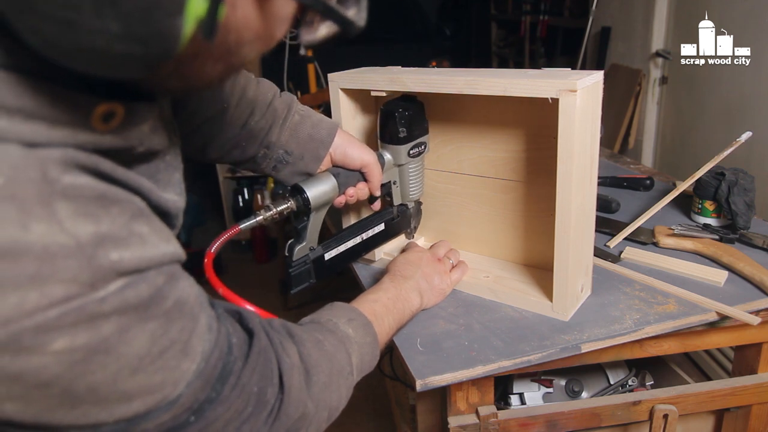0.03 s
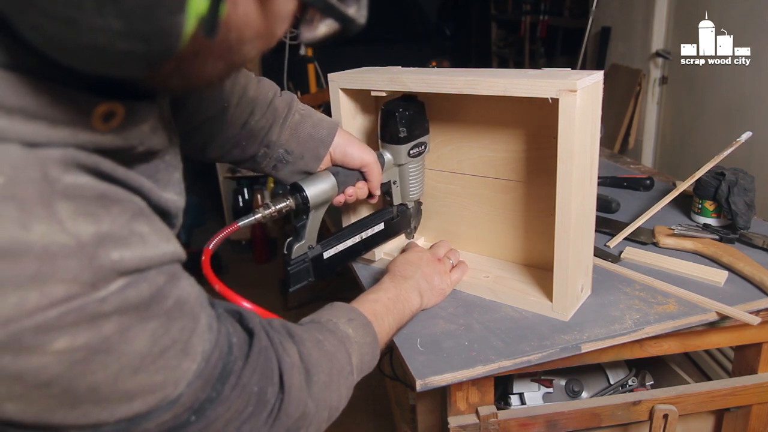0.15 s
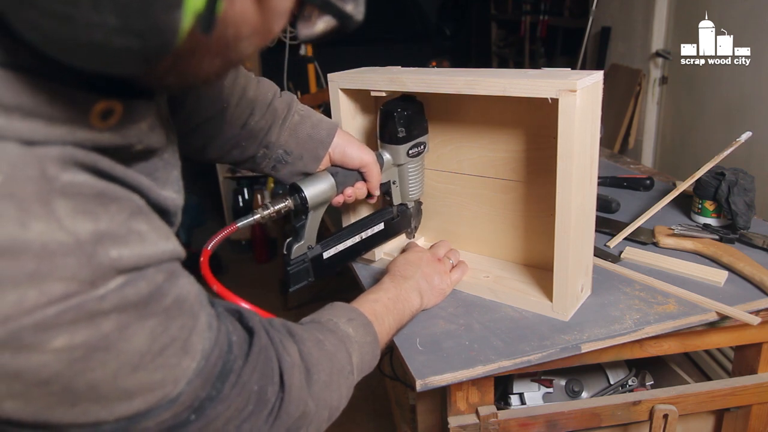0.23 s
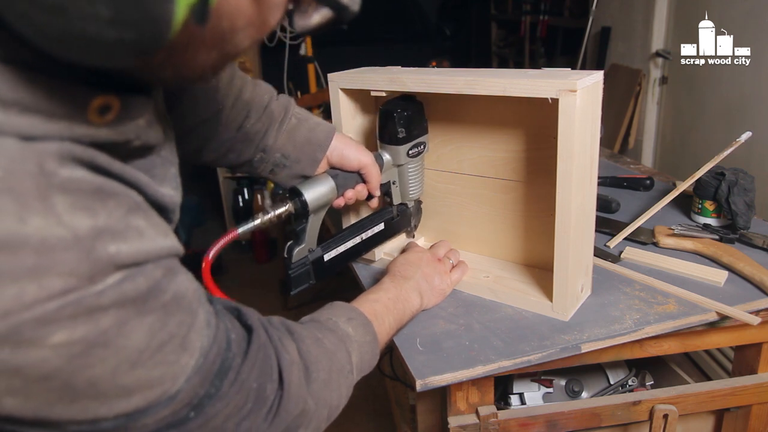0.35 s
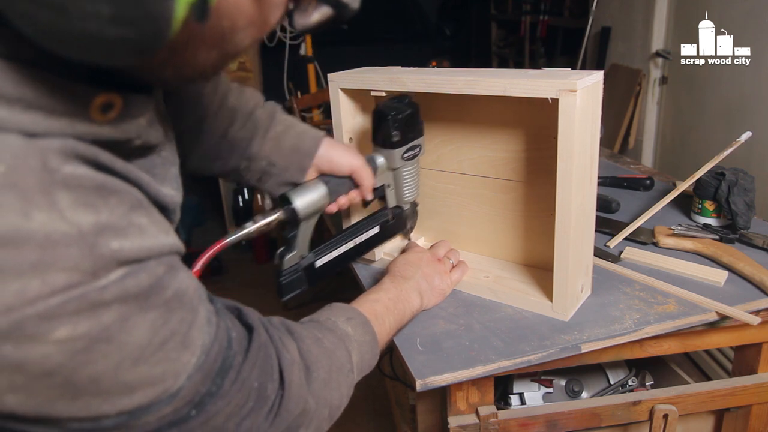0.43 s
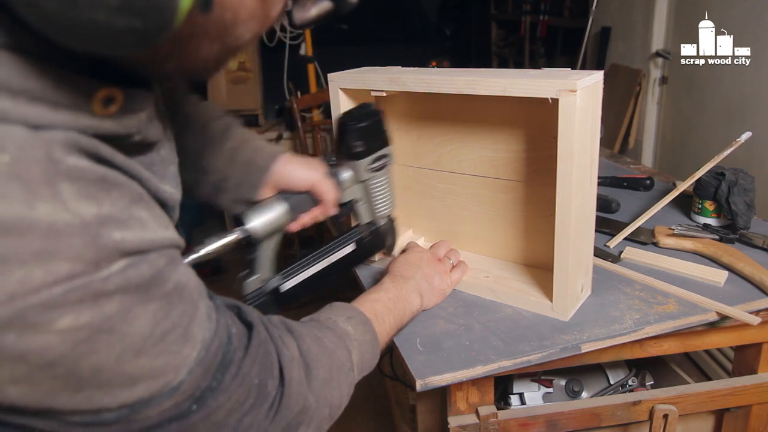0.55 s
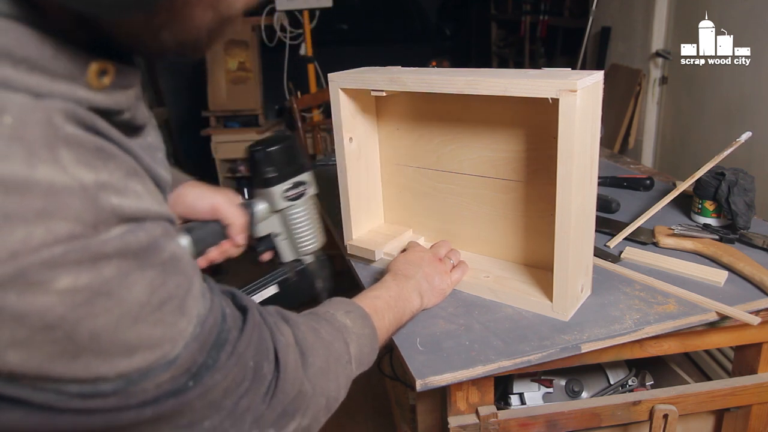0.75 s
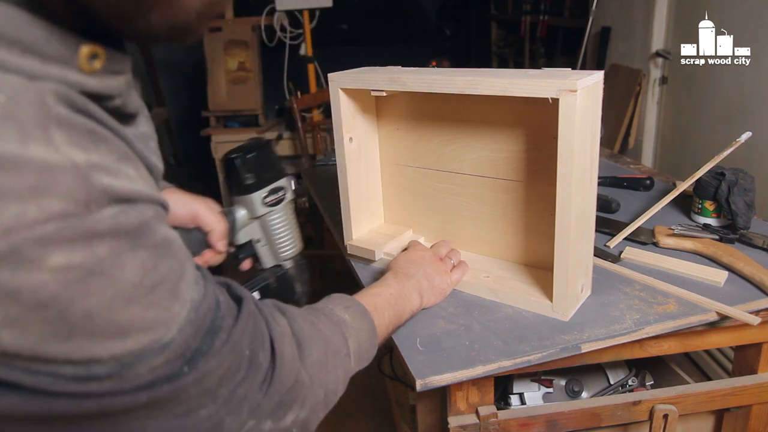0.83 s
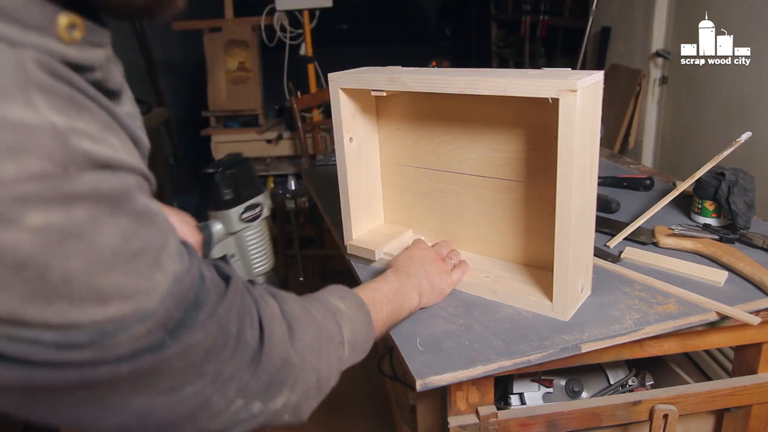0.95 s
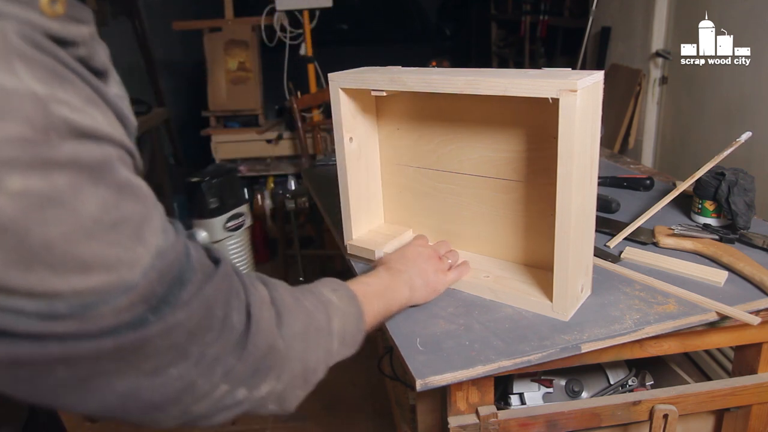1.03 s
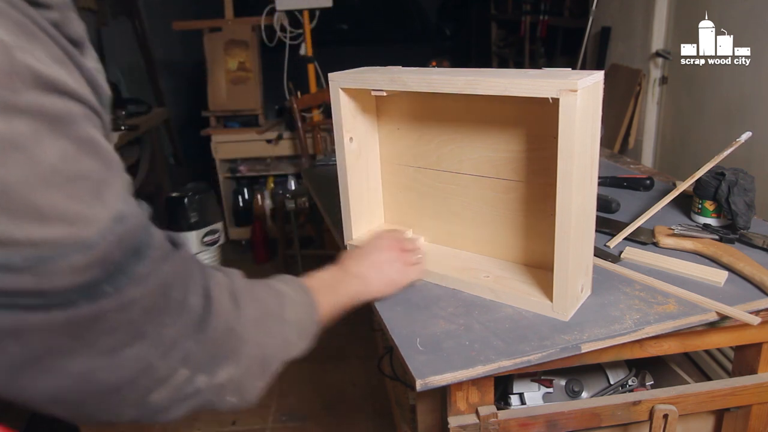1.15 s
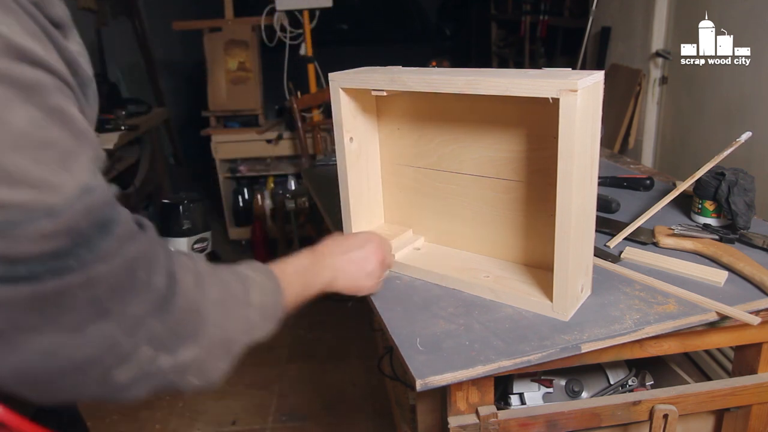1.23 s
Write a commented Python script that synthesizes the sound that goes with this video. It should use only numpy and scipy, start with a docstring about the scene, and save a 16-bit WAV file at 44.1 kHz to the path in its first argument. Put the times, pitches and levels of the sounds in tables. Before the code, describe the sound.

A pneumatic nail gun fires once into a wooden box, a brief air hiss snapping into a loud bang. A trigger click, light tool clacks and a faint wooden slide and knock follow, heard close up in a workshop.

```python
"""A workshop, close up: a pneumatic nailer drives one nail into a wooden box.
Air hisses into the cylinder, the piston slams, and box and room ring; the trigger pings back and the
gun clacks as it lifts. A hand then slides and knocks a wooden block.
The shot overloads a limiter, whose gain dips and creeps back."""
import sys
import numpy as np
from scipy import signal
from scipy.fft import rfft, irfft
from scipy.io import wavfile
from scipy.ndimage import uniform_filter1d

SR = 44100
rng = np.random.default_rng(int(sys.argv[2]) if len(sys.argv) > 2 else 0)


def to_wav(sig):
    """Store sig (one row per channel, or 1-D mono) as 16-bit WAV at the path in sys.argv[1].

    Samples outside -1..1 are clipped; the rate is SR.
    """
    pcm = np.clip(np.atleast_2d(sig), -1, 1) * 32767
    pcm = np.round(pcm).astype(np.int16)
    wavfile.write(sys.argv[1], SR, pcm.T)  # frames by channels


N = 57330

# Levels are relative; a colour is a spectrum shape, per Hz.
# room tone (f/Hz, level/dB)
ROOM_TONE_COLOUR = [(20, -9.5), (70, -6), (145, -1), (250, -6), (450, -9.5), (900, -11.5), (2500, -16.5),
                    (6000, -21.5), (9500, -29.5), (12500, -37), (16000, -60.5)]
# near reflections and long tail: colours (f/Hz, level/dB), decays (f/Hz, t60/s)
EARLY_COLOUR = [(40, -24), (100, -6), (300, 0.5), (700, -1.5), (1500, 0), (4000, -2), (9000, 1.5),
                (15000, 0)]
LATE_COLOUR = [(50, 0), (300, 5), (1000, -2), (3000, 0), (7000, 1), (15000, -5.5)]
EARLY_DECAY = [(60, 0.36), (300, 0.41), (1000, 0.094), (4000, 0.23), (9000, 0.16), (15000, 0.03)]
LATE_DECAY = [(60, 3), (300, 0.88), (1000, 1.157), (3000, 1.074), (6000, 0.88), (9000, .7), (15000, 0.35)]
ROOM_TONE_DB, EARLY_DB, LATE_DB = -64.5, -9.5, -20.5

# handling rumble: fader (t/s, level/dB), colour (f/Hz, level/dB)
RUMBLE_FADER = [(0, -61.5), (.06, -70), (0.169, -65.5), (.25, -74), (.42, -70), (.5, -58.5), (.7, -65),
                (.85, -92), (1.1, -81), (1.199, -64.5), (1.3, -71.5)]
RUMBLE_COLOUR = [(20, -16.5), (70, -2.5), (150, -2.5), (250, -6.5), (600, -17.5), (2000, -53),
                 (16000, -78.5)]
# sleeve and block sliding: fader (t/s, level/dB), colour (f/Hz, level/dB)
SLIDE_FADER = [(0, -96), (.17, -79), (.19, -71.5), (0.233, -67), (.3, -73), (.85, -75.5), (.93, -72),
               (1.05, -68.5), (1.1, -59), (1.181, -63), (1.225, -53), (1.261, -58), (1.3, -55)]
SLIDE_COLOUR = [(50, -16), (200, 2.5), (500, 4), (900, 3), (1700, 0), (2600, 1.5), (3800, -4), (6500, -0.5),
                (9500, -4.5), (12000, -19), (16000, -34)]
# the box bumping the bench (t/s, f/Hz, level/dB, t60/s)
BOX_BUMPS = [(.2, 275, -45, 0.071), (0.572, 376, -38.5, 0.11), (0.643, 145.2, -54.5, 0.63),
             (0.701, 69.4, -62, 1)]
# the block's knock (t/s, level/dB, t60/s) and colour (f/Hz, level/dB)
BLOCK_HIT = (1.2424, -42, 0.05)
BLOCK_COLOUR = [(60, -40), (250, -8), (400, 1.5), (560, 6), (750, -2), (1000, -1.5), (1500, -9.5),
                (3000, -13), (8000, -21), (15000, -31)]

# gun clacks (t/s, level/dB, t60/s, low shelf/dB, high shelf/dB) and colour (f/Hz, level/dB)
CLACK_HITS = [(0.6303, -34.5, 0.023, -31, -11), (1.0659, -43, 0.028, 8, 3.5)]
CLACK_COLOUR = [(60, 2), (350, -14.5), (600, -4), (1000, 9.5), (1700, -3), (2400, -0.5), (3500, -1.5),
                (4450, 0.5), (5400, -13), (8000, -9), (15000, -28)]
# the gun's metal ringing at each clack (f/Hz, level/dB, t60/s)
METAL_MODES = [(2330, -3, .06), (2600, -2, .05), (2830, -4, .05), (4400, 2, .06), (4700, -7, .06)]
# the trigger's tick (t/s, level/dB, t60/s) and colour (f/Hz, level/dB)
TRIGGER_HIT = (.4797, -33, 0.032)
TRIGGER_COLOUR = [(200, -37), (4000, -6.5), (6500, -14), (8900, 2.5), (10500, -9), (15000, -22)]
# its spring (f/Hz, level/dB, t60/s)
SPRING_MODES = [(6455, -2, 0.27), (7747, -13, 0.12), (9300, -6.5, 0.12), (12460, -7.5, 0.18)]

# valve hiss (f/Hz, level/dB) and the whistles of the air passages (f/Hz, width/Hz, boost/dB)
AIR_COLOUR = [(40, -33), (170, -19.5), (400, -27.5), (700, -17), (1500, -17), (2200, -11.5), (2700, -3.5),
              (3250, -16.5), (3800, -3), (4900, -13.5), (7000, -4.5), (9200, -4.5), (11000, -10.5),
              (15500, -24.5)]
AIR_WHISTLES = [(2360, 110, -0.5), (2970, 180, 6), (3753, 150, 2.5), (4380, 42, 9.5), (5740, 110, 10),
                (6925, 110, 5), (7670, 60, 0.5), (9000, 75, 5), (8950, 50, 9.5)]
LEAK_S, OPEN_S, SHUT_S, AIR_RISE_S = .2379, .2405, .281, .00067
AIR_DB, LEAK_DB, AIR_SAG_DB_PER_S, AIR_FLUTTER_DB = -18, -13.5, -330, -1
# dull kicks of valve and piston (t/s, level/dB, t60/s) and their colour (f/Hz, level/dB)
KICK_HITS = [(.2382, -36, .055), (.2778, -27, .018)]
KICK_COLOUR = [(30, -14), (100, -6), (190, 3), (280, -3), (400, -16), (900, -19.5), (3000, -47),
               (16000, -83)]
# the piston's slam and rebounds (t/s, level/dB, t60/s) and their colour (f/Hz, level/dB)
PISTON_HITS = [(.2796, 0, 0.033), (.2824, -4, 0.026), (.2862, -6, 0.039)]
PISTON_COLOUR = [(30, -20), (130, -18.5), (330, -14), (540, -1), (660, -5.5), (760, 0), (960, 3.5),
                 (1150, 3), (1450, 0.5), (1900, -7.5), (2550, -1.5), (3300, -9.5), (6000, -15.5),
                 (10000, -17), (16000, -45)]
# the nail head seating (t/s, level/dB, t60/s) and its colour (f/Hz, level/dB)
NAIL_HIT = (.2833, -1.6, 0.031)
NAIL_COLOUR = [(200, -16.5), (1000, -10), (2500, 0.5), (4700, -0.5), (7500, 1), (10000, -4), (14000, -10.5),
               (16000, -23.5)]
# ring of the box and gun body (f/Hz, level/dB, t60/s)
BODY_MODES = [(305, -10, .2), (800, -8, .14), (882, -7, .14), (942, 2, .18), (1150, -5, .16),
              (1440, -4, .09), (1680, -6, .15), (2432, -10, .13), (2670, -6, .12), (3494, -15, .1),
              (3860, -14, .1)]
METAL_DB, SPRING_DB, BODY_DB = -7, -39.5, -18.5

THRESHOLD_DB, ATTACK_S, RELEASE_DB_PER_S = -16, .0058, 35.5
CEILING_DB, HIGH_CUT_HZ = -9.7, 16100
TIME, FREQS = np.arange(N) / SR, np.fft.rfftfreq(N, 1 / SR)


def amp(db):
    """Decibels to gain."""
    return 10 ** (np.asarray(db) / 20)


def unit(x):
    """Scales to rms 1."""
    return x / np.sqrt(np.mean(x ** 2) + 1e-20)


def curve(points, hz=FREQS):
    """Reads a table on a log-frequency axis."""
    f, value = np.transpose(points)
    return np.interp(np.log(hz + 1), np.log(f + 1), value)


def since(s):
    """Time elapsed since s, zero before it."""
    return np.maximum(TIME - s, 0)


def noise(colour_db):
    """Noise of rms 1 in the given colour."""
    return unit(irfft(rfft(rng.standard_normal(N)) * amp(colour_db), N))


def flicker(samples):
    """Smoothed random modulation of rms 1."""
    return unit(uniform_filter1d(rng.standard_normal(N), size=samples))


def minimum_phase(gain):
    """An EQ response with these gains and no pre-ring."""
    cepstrum = irfft(np.log(gain + 1e-9), N)
    cepstrum[1:N // 2] *= 2
    cepstrum[N // 2 + 1:] = 0
    return np.exp(rfft(cepstrum))


def hit(s, db, t60, colour_db, rise_s=.00057):
    """An impact: a fast-dying noise burst stands for a dense cluster of struck modes."""
    envelope = np.minimum(TIME / rise_s, 1) * amp(-60 * TIME / t60)
    spectrum = rfft(rng.standard_normal(N) * envelope)
    ripple = np.sqrt(uniform_filter1d(abs(spectrum) ** 2, size=60))
    burst = irfft(spectrum * minimum_phase(amp(colour_db) / ripple), N)
    burst *= amp(db) * np.linalg.norm(envelope) / np.linalg.norm(burst)
    return np.pad(burst, (round(s * SR), 0))[:N]


def ring(s, modes, waver_s=.012, depth=.65):
    """Decaying modes struck at s, each wavering in strength and phase."""
    t = since(s)
    knots = np.arange(300) * waver_s
    out = np.zeros(N)
    for hz, db, t60 in modes:
        waver = np.interp(t, knots, rng.standard_normal((len(knots), 2)) @ [1, 1j])
        tone = ((1 - depth + depth * waver) * np.exp(2j * np.pi * hz * t)).imag
        out += amp(db - 60 * t / t60) * tone
    return out * np.minimum(t / .00027, 1)


def room_tone():
    """The workshop's quiet, dark bed of noise."""
    return amp(ROOM_TONE_DB) * noise(curve(ROOM_TONE_COLOUR))


def reflections(decay, colour):
    """Random echoes of energy 1, each band dying at its own speed."""
    hz, t, bands = signal.stft(rng.standard_normal(N), SR, nperseg=256)
    bands *= amp(-60 * t / curve(decay, hz)[:, None])
    taps = signal.istft(bands, SR, nperseg=256)[1][:N]
    fade_in = np.minimum(since(.0014) / .003, 1)
    taps = irfft(rfft(taps) * amp(curve(colour)), N) * fade_in
    return taps / np.linalg.norm(taps)


def reverb(sound):
    """Adds near reflections and a long tail, in a fresh pattern each call."""
    early = amp(EARLY_DB) * reflections(EARLY_DECAY, EARLY_COLOUR)
    late = amp(LATE_DB) * reflections(LATE_DECAY, LATE_COLOUR)
    return sound + signal.fftconvolve(sound, early + late)[:N]


def rumble():
    """Low swells of handling noise."""
    return noise(curve(RUMBLE_COLOUR)) * amp(np.interp(TIME, *np.transpose(RUMBLE_FADER)))


def slide(grain_db=1.5):
    """Sleeve and block rub with a grainy rustle."""
    level_db = np.interp(TIME, *np.transpose(SLIDE_FADER)) + grain_db * flicker(120)
    return noise(curve(SLIDE_COLOUR)) * amp(level_db)


def box_bumps():
    """The box bumps the bench, one soft, hollow mode at a time."""
    return sum(ring(s, [mode]) * np.minimum(since(s) / .0017, 1) for s, *mode in BOX_BUMPS)


def block_knock():
    """The block taps the box, wood on wood."""
    return hit(*BLOCK_HIT, curve(BLOCK_COLOUR))


def gun_clacks(low_hz=907, high_hz=4000):
    """The gun clacks as it is moved, and its metal rings briefly."""
    low_shelf = 1 / (1 + (FREQS / low_hz) ** 2)
    high_shelf = 1 / (1 + (high_hz / (FREQS + 1)) ** 2)
    clacks = np.zeros(N)
    for s, db, t60, low_db, high_db in CLACK_HITS:
        colour_db = curve(CLACK_COLOUR) + low_db * low_shelf + high_db * high_shelf
        clacks += hit(s, db, t60, colour_db, rise_s=.00093)
    return clacks + sum(amp(db + METAL_DB) * ring(s, METAL_MODES) for s, db, *_ in CLACK_HITS)


def trigger():
    """The trigger snaps back: a bright tick and a thin ping of its spring."""
    tick = hit(*TRIGGER_HIT, curve(TRIGGER_COLOUR))
    return tick + amp(SPRING_DB) * ring(TRIGGER_HIT[0], SPRING_MODES)


def recoil_push(s=.3, db=-22, length_s=.0021):
    """The gun recoils: one low, dry pressure thump just after the slam."""
    age = since(s) / length_s
    return amp(db) * age * (2 - age) * np.exp(1 - age)


def valve_hiss():
    """Compressed air leaks, then whistles through at full flow, sagging until the piston lands."""
    whistles_db = sum(db / (1 + (2 * (FREQS - hz) / width) ** 2) for hz, width, db in AIR_WHISTLES)
    leak = amp(LEAK_DB) * np.minimum(since(LEAK_S) / AIR_RISE_S, 1)
    opening = np.minimum(since(OPEN_S) / AIR_RISE_S, 1)
    flow = np.maximum(leak, opening) * np.exp(-since(SHUT_S) / .0091)
    level_db = AIR_DB + AIR_SAG_DB_PER_S * since(OPEN_S) + AIR_FLUTTER_DB * flicker(90)
    return noise(curve(AIR_COLOUR) + whistles_db) * flow * amp(level_db)


def shot():
    """Separate stems: the gun kicks, the piston slams and rebounds, the nail seats, the box rings."""
    kick = sum(hit(*row, curve(KICK_COLOUR), rise_s=.00063) for row in KICK_HITS)
    slams = [hit(*row, curve(PISTON_COLOUR), rise_s=.0007) for row in PISTON_HITS]
    nail = hit(*NAIL_HIT, curve(NAIL_COLOUR))
    body = amp(BODY_DB) * ring(PISTON_HITS[0][0], BODY_MODES)
    return slams + [nail, kick + body]


def scene():
    """Mono mix: shot and foley in the reverb, the recoil push dry, room tone beneath."""
    stems = shot()
    foley = valve_hiss() + trigger() + gun_clacks() + block_knock() + box_bumps() + slide() + rumble()
    in_room = sum(reverb(stem) for stem in stems + [foley])
    return (in_room + recoil_push() + room_tone())[None]


def record(dry):
    """A limiter grabs too late, so the slam clips; the gain creeps back. A high cut comes last."""
    pole = np.exp(-1 / (.0026 * SR))  # 2.6 ms level detector
    power = signal.lfilter([1 - pole], [1, -pole], dry[0] ** 2)
    over_db = np.maximum(10 * np.log10(power + 1e-12) - THRESHOLD_DB, 0)
    release_db = RELEASE_DB_PER_S * TIME
    held_db = np.maximum.accumulate(over_db + release_db) - release_db
    attack = np.exp(-1 / (ATTACK_S * SR))
    duck_db = signal.lfilter([1 - attack], [1, -attack], held_db)
    drive = dry * amp(-duck_db - CEILING_DB)
    clipped = amp(CEILING_DB) * drive / (1 + drive ** 8) ** (1 / 8)
    high_cut = signal.firwin(511, HIGH_CUT_HZ, window=("kaiser", 9), fs=SR)
    return signal.oaconvolve(clipped, high_cut[None], "same")


dry = scene()
out = record(dry)
to_wav(out)
```